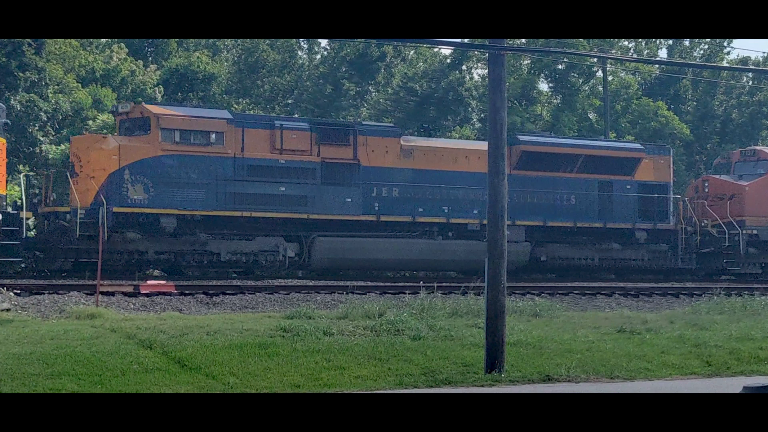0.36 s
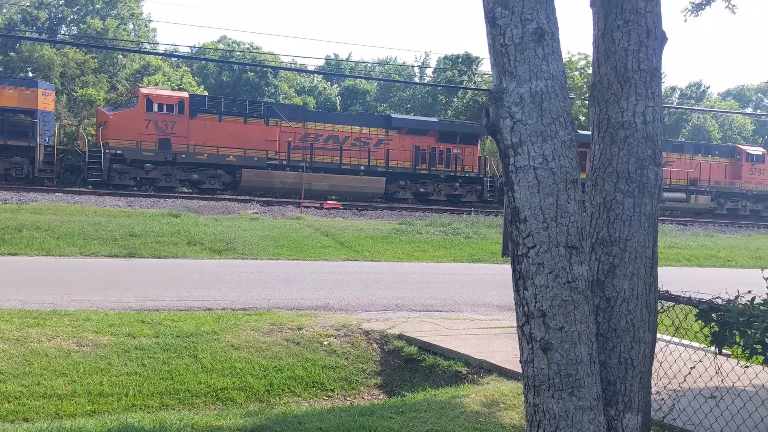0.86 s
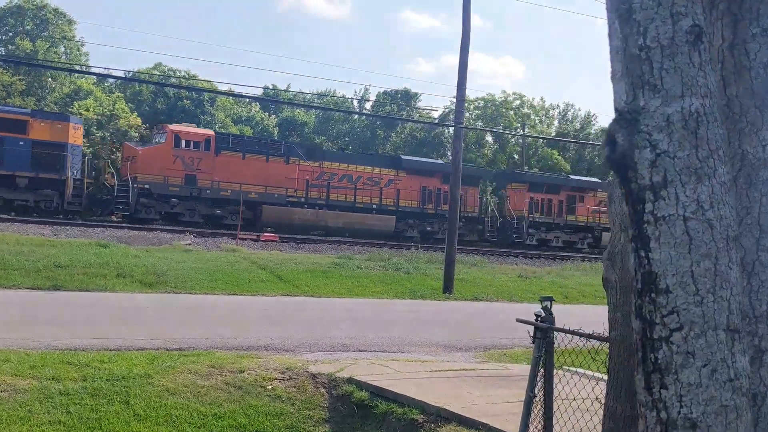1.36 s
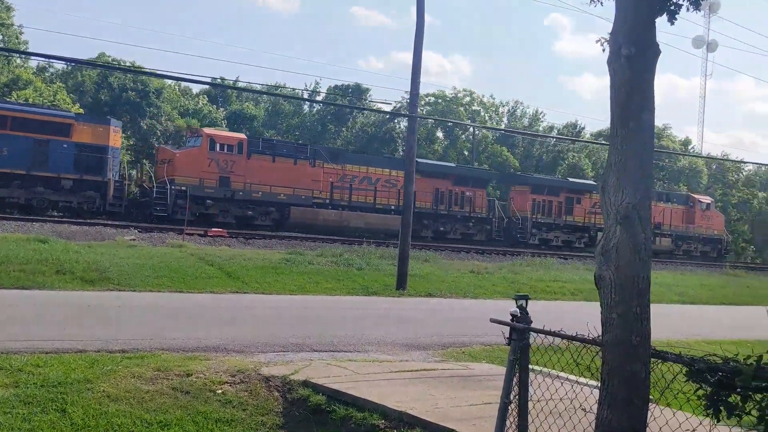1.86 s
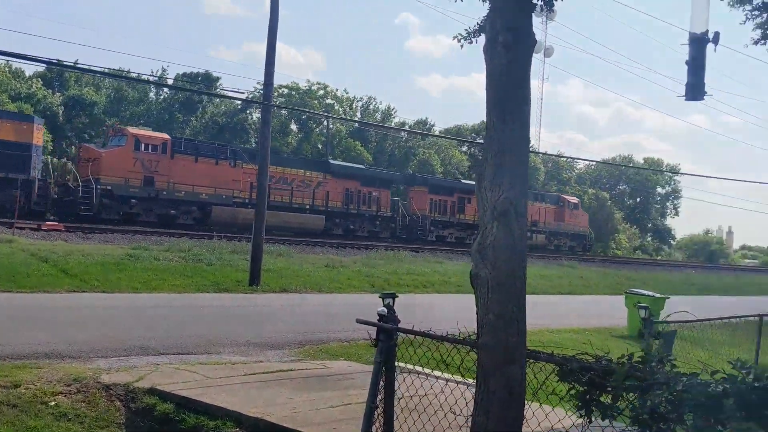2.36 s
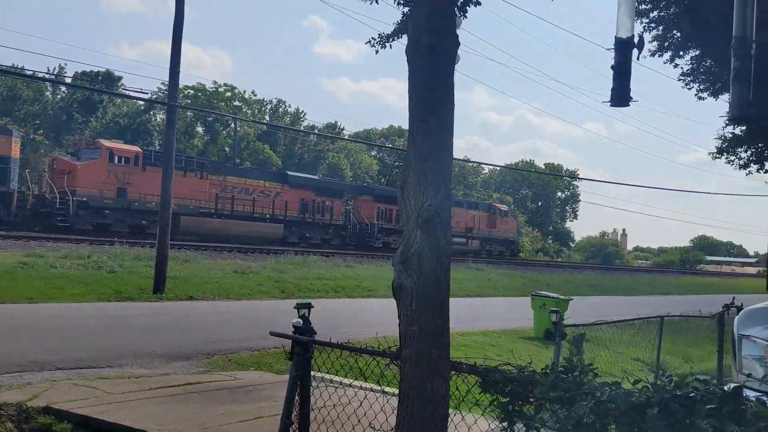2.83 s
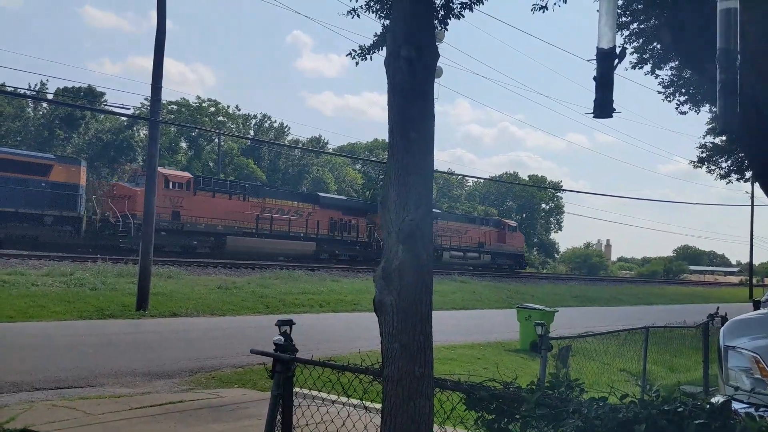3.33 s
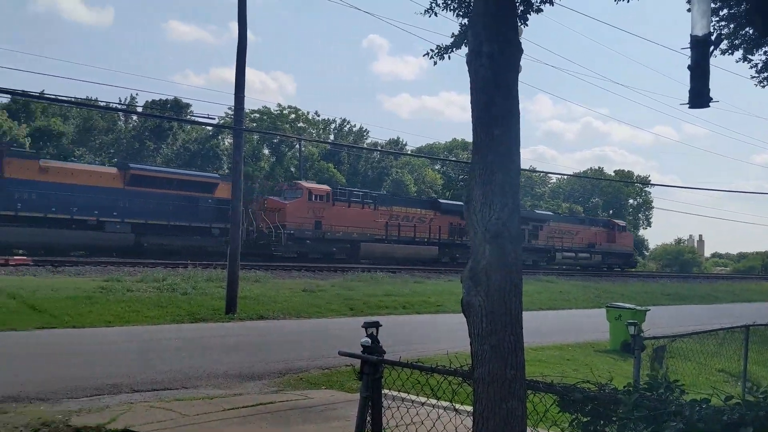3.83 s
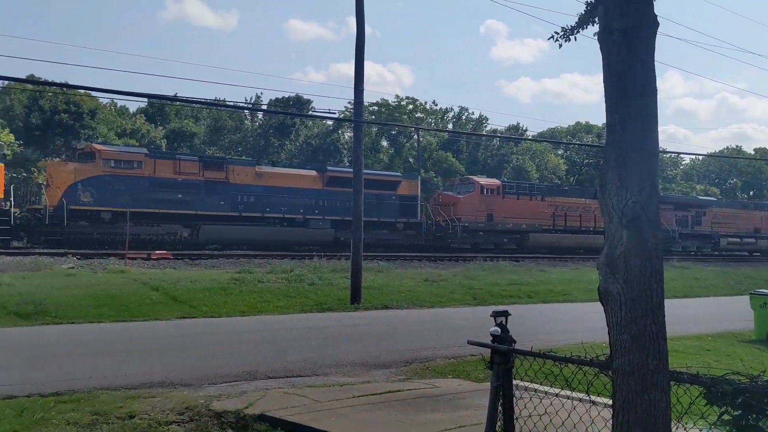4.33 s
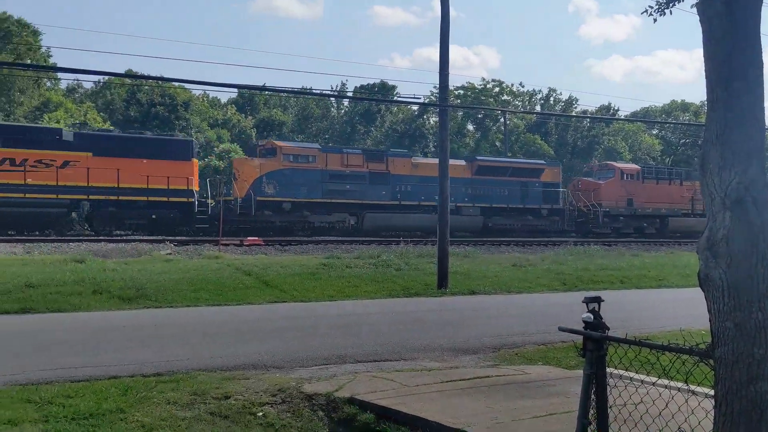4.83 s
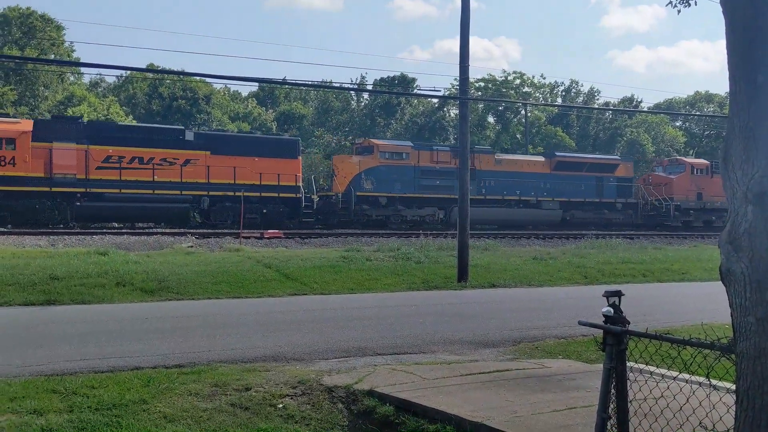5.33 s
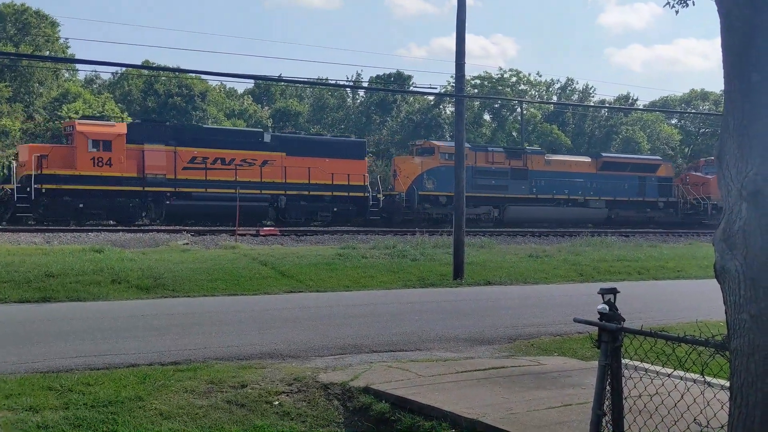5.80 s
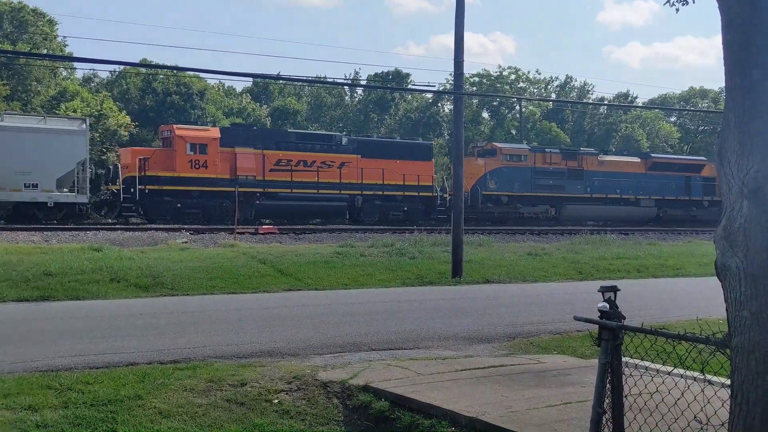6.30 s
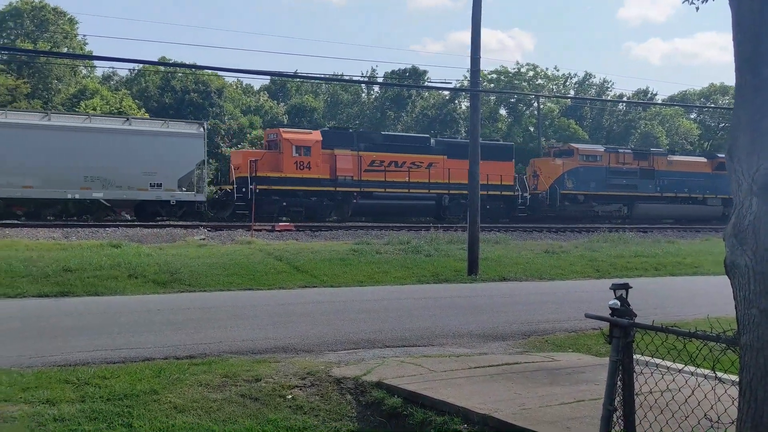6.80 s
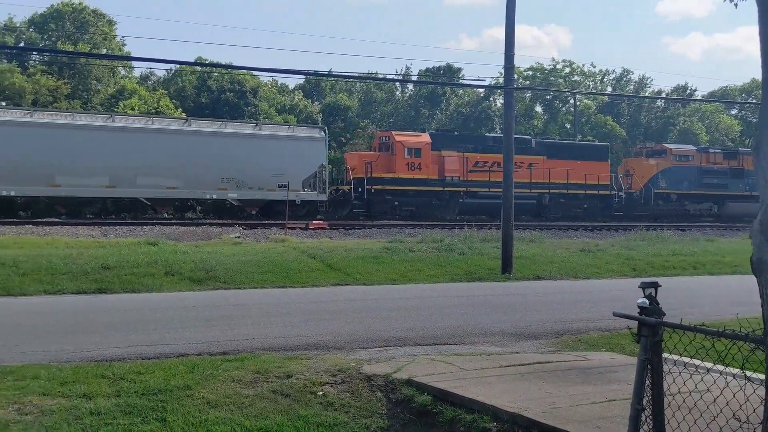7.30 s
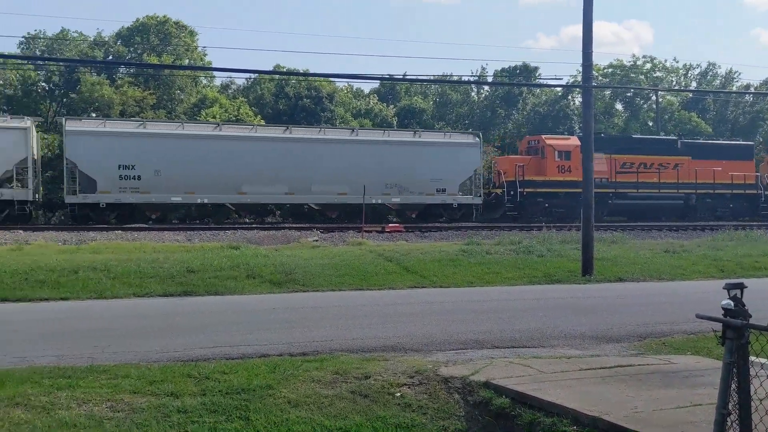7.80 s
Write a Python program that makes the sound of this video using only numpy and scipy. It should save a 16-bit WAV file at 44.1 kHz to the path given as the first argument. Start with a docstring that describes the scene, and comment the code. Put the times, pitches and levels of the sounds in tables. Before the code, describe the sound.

A slow freight train heard from across a road on a handheld stereo phone. Silence, then a sudden entry with a tiny dropout; two engine rhythms beat against each other under rough, wide wheel noise. Hissing puffs and whining gears peak as the middle locomotive passes, and the hum drops away. The last engine brings ticking clatter and ringing loose metal, then a few close snaps.

```python
"""Beside a railway, across a road: diesel locomotives haul a freight train slowly past a hand-held phone.
Crank orders of a four-stroke and a two-stroke engine throb against each other; a fan and gears whine as tones.
Wheels, exhaust, casing and air are bands of coloured noise; the valve clatter beats in time with the firing.
Loose metal pings as short resonances, and close ticks snap. The sound cuts in late, with one short dropout."""
import sys
import numpy as np
from scipy import signal
from scipy.fft import rfft, irfft, next_fast_len
from scipy.io import wavfile
from scipy.ndimage import map_coordinates

SR = 44100
rng = np.random.default_rng(int(sys.argv[2]) if len(sys.argv) > 2 else 0)


def ratio(d):
    """dB to gain"""
    e = np.asarray(d, float) / 20
    return 10 ** e


def transcribe(u):
    """Save the signal u as a 16-bit wav file named by the first command-line argument.

    u: samples, shape (n,) or (channels, n), limited to [-1, 1]; the rate is SR.
    q: integer samples, one column per channel.
    """
    v = np.clip(np.atleast_2d(u).T, -1, 1)
    q = np.round(v * 32767).astype(np.int16)
    wavfile.write(sys.argv[1], SR, q)


N = 359856

# colour of the noise at the two microphone ports, low to high, each:
# (frequency [Hz], left density [dB per Hz], right density [dB per Hz])
ROAR_COLOUR = [(292, 5.5, 14), (410, 7.5, 1), (460, 10, 7.5), (560, 9, 9), (595, 10.5, 10), (780, -1, 3.5),
               (826, 9, 4), (953, 6, 3), (979, 9, 13), (1104, 9, 1.5), (1210, 16.5, 11), (1280, 10, 13),
               (1431, 18.5, 14.5), (1458, -16, 12)]
# the same columns, for the valve clatter
CLATTER_COLOUR = [(1610, 5, 8), (1900, 6.5, 5), (2296, 3.5, 4.5), (2614, -5, -10.5), (2860, 2.5, -1),
                  (3270, 6, -9), (3440, -2, -1.5), (4540, -3.5, -11.5), (4770, -11, -3.5),
                  (5090, -2.5, -16), (6270, -8, -5.5), (6770, -6.5, -7.5)]
# the same columns, for the escaping air
HISS_COLOUR = [(7120, -5.5, -14), (7660, -19, -6.5), (8200, -0.5, -10), (8920, -5.5, -13), (9060, 1, -21),
               (9460, -8.5, -14), (10400, -14.5, -15.5), (10750, -10, -22), (11210, 2.5, -4),
               (11850, -4.5, -13), (13500, -12, -21), (14770, -18, -13), (15800, -26, -26)]
PORT_COLOUR = ROAR_COLOUR + CLATTER_COLOUR + HISS_COLOUR
# crank speeds, sinking as the engines draw away:
# (time [s], four-stroke cycles [per s], two-stroke turns [per s])
CRANK_SPEEDS = [(.9, 7.305, 12.68), (2, 7.281, 12.653), (3.2, 7.26, 12.617), (4.4, 7.255, 12.544),
                (5.6, 7.247, 12.496), (6.8, 7.24, 12.457), (8.1, 7.238, 12.43)]
# how much one engine dominates, as left-right likeness:
# (time [s], casing [0-1], upper rattle [0-1], knock [0-1])
ENGINE_FOCUS = [(.9, .3, 0.74, 0.3), (2, 0.16, 0.38, 0.19), (3.8, 0.33, 0.41, 0.13),
                (4.5, 0.16, 0.15, 0.12), (6.4, 0.79, 0.14, 0.17), (8.1, 0.94, 0.53, .35)]
# the treble sinks at the very end: (time [s], half length [s], change [dB])
END_DIP = (8.16, 0.11, -9)


def rms_one(x):
    """Scale to unit power."""
    return x / np.sqrt(np.mean(x ** 2) + 1e-20)


def in_time(rows):
    """Table columns as curves, one value a sample."""
    s, *columns = np.transpose(rows)
    return [np.interp(np.arange(N) / SR, s, c) for c in columns]


def at_hz(points, hz):
    """Read the columns of a spectrum on a log-frequency axis."""
    at, *columns = np.transpose(points)
    return np.array([np.interp(np.log(hz), np.log(at), c) for c in columns])


def swell(s, half_s, rise_db):
    """A bell-shaped rise (or dip) of level in dB, held in steps of 100 samples."""
    t = np.arange(0, N + 200, 100) / SR
    bell = rise_db * np.exp(-((t - s) / half_s) ** 2)
    return np.repeat(bell, 100)[50:N + 50]


def swells(rows):
    """Several rises added up."""
    return sum(swell(*row) for row in rows)


def own_swells(rows, which):
    """The added rises of those rows whose first column names this part."""
    return swells(row[1:] for row in rows if round(row[0]) == which)


def step(s, within_s):
    """A smooth change from 0 to 1."""
    return .5 + .5 * np.tanh((np.arange(N) / SR - s) / within_s)


def drift(rate):
    """Slow random curve of spread 1: coarse noise through a double one-pole with its corner at rate [Hz]."""
    r = np.exp(-80 * np.pi * rate / SR)  # one coarse value every 40 samples
    coarse = rng.standard_normal(N // 40 + 2002)
    slow = signal.lfilter([1], [1, -2 * r, r * r], coarse)[2000:]  # skip the filter's start
    return np.interp(np.arange(N) / 40, np.arange(len(slow)), rms_one(slow))


def noise(colour, low_hz, high_hz, level_db, patchy_db, focus=None):
    """A steep band of noise at two partly alike ports; its level wavers, partly on each side alone."""
    # how alike the ports sound: (frequency [Hz], likeness [0-1])
    port_likeness = [(270, 0.95), (450, 0.91), (740, 0.58), (1200, 0.32), (2000, 0.4), (4000, 0.044),
                     (8000, 0.045)]
    size = next_fast_len(N)
    hz = np.arange(1, size // 2 + 2) * SR / size
    band = 1 / np.sqrt((1 + (low_hz / hz) ** 40) * (1 + (hz / high_hz) ** 40))
    gain = ratio(at_hz(colour, hz)) * band
    shared, own = rfft(rng.standard_normal((2, size)))
    if focus is None:  # likeness by frequency
        alike = np.clip(at_hz(port_likeness, hz)[0], 0, 1)
        mid, side = np.sqrt(1 + alike) * shared, np.sqrt(1 - alike) * own
        pair = irfft(np.array([mid + side, mid - side]) * gain, size)[:, :N]
    else:  # likeness by time
        alike = np.clip(focus, 0, 1)
        mid, side = irfft(shared * gain, size)[:, :N], irfft(own * gain, size)[:, :N]
        pair = np.sqrt(1 + alike) * mid + np.sqrt(1 - alike) * side * [[1], [-1]]
    pair = pair / np.sqrt(np.mean(pair ** 2) * 0.59)
    each_side = np.array([drift(2.2), drift(0.97)])
    return pair * ratio(level_db + patchy_db * (drift(10.0) + 1.03 * each_side))


def tone(turns, level_db, waver_db):
    """A sine on a running phase, with a slight waver of level."""
    level = ratio(level_db + waver_db * drift(0.44))
    return np.sqrt(2) * level * np.sin(2 * np.pi * turns)


def whine(hz, level_db, wobble, lead=0):
    """One tone whose phase wobbles (in turns), which widens its line; lead is in radians."""
    turns = np.cumsum(hz) / SR + lead / (2 * np.pi) + wobble * drift(5.9)
    return tone(turns, level_db, waver_db=0.1)


def nearness():
    """The last engine comes near: 0 before, 1 after."""
    return step(6.68, within_s=0.14)


def knock_beat(depth, swell_s):
    """Six knocks per four-stroke cycle, each a quick swell that dies away; power kept at 1."""
    # strength of the valve knocks in one engine cycle: (level [dB])
    knock_strengths = [-0.5, -16, 12.5, 5.5, 14.5, -9]
    count = len(knock_strengths)
    slots = np.cumsum(in_time(CRANK_SPEEDS)[0]) / SR * count
    which = slots.astype(int)
    uneven_db = 1.7 * rng.standard_normal(which[-1] + 1)[which]
    strength = ratio(np.array(knock_strengths)[which % count] + uneven_db)
    since = (slots - which) / (np.gradient(slots) * SR * swell_s)  # time since the knock, in swell_s
    pulses = rms_one(strength * since ** 2 * np.exp(-since))
    share = np.clip(depth, 0, 1)
    return np.sqrt(1 - share + share * pulses ** 2)


def wheel_roar(lag):
    """Wheel noise, fuller as the middle engine is abreast; from the whole train, so its lag is smaller."""
    # the roar while the middle engine is abreast: (time [s], half length [s], rise [dB])
    abreast_swell = (4.76, 0.96, 1.9)
    level_db = -23 - 0.6447 * np.arange(N) / SR + swell(*abreast_swell)
    roar = noise(ROAR_COLOUR, 322.0, 1129, level_db, patchy_db=0.4)
    roar[0] = np.interp(np.arange(N) - 0.38 * lag, np.arange(N), roar[0])
    return roar


def air():
    """Escaping air hisses: dull puffs feed the whistling band, bright ones the top hiss, both the low hiss."""
    # puffs, before each band takes its share: (time [s], half length [s], rise [dB], brightness [0-1])
    air_puffs = [(2.7, 0.21, 7.5, 0.16), (3.275, 0.14, 4, 0.3), (4.15, 0.13, 7, 0.75),
                 (4.515, 0.21, 9.5, 0.63), (5.223, 0.091, 13.5, 0.6), (5.617, 0.06, 8, 0.3),
                 (5.823, 0.17, 11, 1), (6.55, 0.045, 6, 1), (7.06, 0.62, 8.5, 0.03), (7.92, 0.19, 11, 0.3)]
    abreast_db = swell(4.3, 3, 6.5) + swell(*END_DIP)  # loudest abreast
    dull_db = swells((s, half_s, db * (1 - bright)) for s, half_s, db, bright in air_puffs)
    bright_db = swells((s, half_s, db * bright) for s, half_s, db, bright in air_puffs)
    opening_db = 3 * step(3.9, 0.098)  # the low hiss opens up
    low_db = -46.5 + opening_db + 0.26 * dull_db + 0.45 * bright_db + abreast_db
    whistle_db = -48 + abreast_db + 1.08 * dull_db
    top_db = -51.5 + abreast_db + 0.83 * bright_db
    out = noise(PORT_COLOUR, 6830, 11240, low_db, patchy_db=0.94)
    out += noise(PORT_COLOUR, 10400, 11200, whistle_db, patchy_db=1.5)
    return out + noise(PORT_COLOUR, 12400, SR / 2, top_db, patchy_db=0.9)


def ticks():
    """Sharp ticks close to the microphone: a snap with a millisecond of noise, without bass."""
    # close ticks: (time [s], nominal peak [dB], left over right [dB])
    close_ticks = [(8.0022, -17, .2), (8.0135, -5, -1.2), (8.0401, -5.5, 2.2)]
    out, t = np.zeros((2, N)), np.arange(200) / SR
    for s, peak_db, pan_db in close_ticks:
        hiss = 1.05 * rng.standard_normal(len(t)) * t / .0004 * np.exp(-t / .0004)
        snap = np.exp(-abs(t - .0004) / .00002)
        burst = signal.lfilter([1, -1], [1, -.75], hiss - snap)
        at = round(s * SR)
        out[:, at:at + len(t)] += ratio(peak_db + pan_db * np.array([[.5], [-.5]])) * burst
    return out


def fan():
    """The cooling fan hums on one pitch, fades and is then screened off."""
    level_db = -23.5 - 1.17 * np.arange(N) / SR - 21.5 * step(4.59, within_s=0.055)
    return whine(np.full(N, 209.4), level_db, wobble=.02)


def gears():
    """Each gear whines at its multiple of the two-stroke speed; its direction swings as it passes."""
    # pitch of each gear: (multiple of the two-stroke crank speed)
    gear_multiples = [47.93, 78.86, 112.8, 187.9]
    # each gear crosses in front: (time [s], within [s], left lead before [rad], after [rad],
    # left over right before [dB], after [dB])
    crossings = [(4.8, 2.5, .7, -.45, -4, 2), (3.7, .5, 2.8, .2, -7, 3), (5.1, .3, 2.4, -1.9, 1, 2),
                 (5, 1.5, .3, -1.5, 3, 0)]
    # resting level of each gear: (level [dB])
    resting_levels = [-43, -43.5, -43.5, -50]
    # a whine swells out of the roar: (gear [0-3], time [s], half length [s], rise [dB])
    gear_swells = [(0, 0.75, 0.25, 22), (0, 1.37, 0.41, 14), (0, 2.12, 0.29, 12.5), (0, 3.61, 0.17, 14.5),
                   (0, 4.21, 0.35, 11.5), (0, 4.77, 0.2, 12), (0, 5.66, 0.26, 12.5), (0, 6.3, 0.69, 8.5),
                   (0, 7.06, 0.59, 9), (1, 2.5, 0.47, 19.5), (1, 3.97, 0.11, 10), (1, 4.28, 0.29, 16),
                   (1, 4.97, 0.22, 19), (1, 5.45, 0.27, 14), (1, 5.97, 0.069, 15), (1, 6.45, 0.4, 12),
                   (1, 6.92, 0.12, 12), (2, 4.55, 0.18, 15), (2, 5.27, 0.31, 11), (2, 6.87, 0.45, 13),
                   (3, 6.1, 0.37, 9), (3, 5.3, 0.8, 7.5)]
    turns_per_s = in_time(CRANK_SPEEDS)[1]
    out, sides = 0, np.array([[.5], [-.5]])
    for i, (multiple, crossing) in enumerate(zip(gear_multiples, crossings)):
        s, within_s, lead, lead_after, pan_db, pan_after_db = crossing
        past = step(s, within_s)
        side_db = sides * (pan_db + (pan_after_db - pan_db) * past)
        side_lead = sides * (lead + (lead_after - lead) * past)
        level_db = resting_levels[i] + own_swells(gear_swells, i) + side_db
        out = out + whine(multiple * turns_per_s, level_db, wobble=0.017, lead=side_lead)
    return out


def pings(modes_hz, level_db):
    """Random clicks ring a few short modes, louder at the left port."""
    clicks_per_s, ring_t60_s = 50, 0.013  # clicks for each mode
    shape = (len(modes_hz), N)
    sizes = ratio(3 * np.minimum(rng.exponential(1, shape), 3))
    clicks = (rng.random(shape) < clicks_per_s / SR) * sizes
    r = ratio(-60 / (ring_t60_s * SR))
    rings = 0
    for hz, mode_clicks in zip(modes_hz, clicks):
        poles = [1, -2 * r * np.cos(2 * np.pi * hz / SR), r * r]
        rings = rings + signal.lfilter([1, -1], poles, mode_clicks + 1e-18)
    softened = signal.lfilter([.2], [1, -.8], rings)
    return rms_one(softened) * ratio(level_db + np.array([[2.5], [-2.5]]))


def clanks():
    """Each loud ping swells within milliseconds and rings out over 104 cycles, louder at the left port."""
    # the loudest pings: (time [s], nominal peak [dB], pitch [Hz])
    loud_pings = [(6.1226, -20, 3170), (6.2747, -17.5, 3290), (6.5587, -22, 3130), (6.7463, -16, 3130),
                  (6.885, -22, 3330), (7.024, -18, 3440), (7.06, -23, 4000), (7.102, -14, 3180),
                  (7.113, -17, 3370), (7.2431, -21, 4460), (7.4811, -25, 4330), (7.5185, -20.5, 4310),
                  (7.6557, -15, 4230), (7.9365, -18, 5970)]
    out, t = np.zeros((2, N)), np.arange(2000) / SR
    for s, peak_db, hz in loud_pings:
        at = round(s * SR)
        ring = (1 - np.exp(-t / 0.0014)) * ratio(-60 * t * hz / 104.0) * np.sin(2 * np.pi * hz * t)
        # 3.5 dB makes up for the slow attack
        out[:, at:at + len(t)] += ratio(peak_db + 3.5 + np.array([[2.5], [-2.5]])) * ring
    return out


def casing_rattle():
    """The engine casing rattles in two bands of noise that beat slightly with the firing."""
    # louder rattles: (time [s], half length [s], casing rise [dB], part of it in the upper band [0-1])
    rattle_swells = [(1.146, 0.39, 4.5, 0.55), (2.81, 0.082, 2, 0.5), (3.254, 0.89, 4.5, 0.46),
                     (3.33, 0.067, 3, 0.4), (3.694, 0.054, 5.5, 0.8), (3.94, 0.14, 6, 0.66),
                     (4.9, 0.89, 3, 0.17), (5.7, 0.5, 2.5, 1), (6.993, 0.2, 5, 0.5), (7.782, 0.12, 8, 0.4)]
    casing, upper, _ = in_time(ENGINE_FOCUS)
    casing_db = -28.5 - 0.28 * np.arange(N) / SR + swells(row[:3] for row in rattle_swells)
    upper_db = -30.5 - 1 * step(3.3, 0.032)  # screened off a little
    upper_db = upper_db + swells((s, half_s, db * part) for s, half_s, db, part in rattle_swells)
    low = noise(PORT_COLOUR, 1168, 1620, casing_db, patchy_db=0.67, focus=casing)
    high = noise(PORT_COLOUR, 1664, 2730, upper_db, patchy_db=1.07, focus=upper)
    return low * knock_beat(0.2, swell_s=0.0022) + high * knock_beat(0.15, swell_s=0.0023)


def valve_gear():
    """Valve gear knocks and clatters as noise in time with the firing, and loose metal rings with it."""
    # the ringing knock flares: (time [s], half length [s], rise [dB])
    knock_flares = [(1.9, 0.13, 2), (6.4, 1, 4.5), (7.09, 0.028, 5)]
    # pitches of the loose metal: (frequency [Hz])
    ping_pitches = [3110, 3300, 3290]
    # a short scrape makes the pings loud: (time [s], half length [s], rise [dB])
    metal_scrape = (7.09, 0.032, 5.7)
    # parts that clatter on their own: (low edge [Hz], high edge [Hz], share [dB])
    valve_parts = [(3800, 4600, -4.5), (4600, 5500, -5.5), (5500, 6400, -7), (6400, 7600, -7)]
    # one part clatters louder for a while: (part [0-3], time [s], half length [s], rise [dB])
    part_swells = [(0, 3.5, 0.82, 3), (1, 5.46, 0.85, 4.5), (2, 5.5, .5, 5)]
    near = nearness()
    depth = 0.14 + 0.13 * near  # of the beat, before each layer takes its share
    ringing_db = -34.5 + 2.31 * near + swells(knock_flares)
    out = pings(ping_pitches, ringing_db - 3 - 4.3 * (1 - near) + swell(*metal_scrape))
    # smaller parts jingle with the knocks once the last engine is near
    jingle = pings([4300, 5000, 5940, 6650], -39 + swell(*END_DIP))
    out += jingle * near * knock_beat(0.5, swell_s=0.0049)
    focus = in_time(ENGINE_FOCUS)[2]
    knock = noise(PORT_COLOUR, 2290, 3820, ringing_db - 1.0 * near, patchy_db=1.07, focus=focus)
    out += knock * knock_beat(0.65 * depth, swell_s=0.0027)
    clatter_db = -37 + 5.5 * near + swell(*END_DIP)
    for i, (low_hz, high_hz, share_db) in enumerate(valve_parts):
        part_db = clatter_db + share_db + own_swells(part_swells, i)
        part = noise(PORT_COLOUR, low_hz, high_hz, part_db, patchy_db=1.0)
        out += part * knock_beat(0.84 * depth, swell_s=0.0029)
    return out


def exhaust_rumble():
    """The exhaust rumbles as smooth low noise that fades with time."""
    # colour of the rumble: (frequency [Hz], density [dB per Hz])
    rumble_colour = [(25, -28), (40, -15), (60, -2), (90, -5.5), (120, -6.5), (150, -10), (200, -9),
                     (250, -16), (320, -20.5), (360, -42)]
    level_db = -18.5 - 1.07 * np.arange(N) / SR
    return noise(rumble_colour, 14, 380, level_db, patchy_db=0.85)


def engine(rate, orders, changes):
    """Sines at multiples of the crank cycle; each changes with distance and swells past obstacles."""
    turns, t, out = np.cumsum(rate) / SR, np.arange(N) / SR, 0
    for order, level_db, fade_db in orders:
        # orders 12 and 15 keep step with the exhaust pulse, trailing it by a fifth of their own cycle
        lag_turns = 0.2 if order in (12, 15) else rng.random()
        order_db = level_db + fade_db * t + own_swells(changes, order)
        out = out + tone(order * turns - lag_turns, order_db, waver_db=.5)
    return out


def engine_throb():
    """A four-stroke and a two-stroke engine at slightly sinking speeds throb against each other."""
    # orders of the four-stroke cycle: (order, level at 0 s [dB], change with distance [dB per s])
    four_orders = [(9, -24, -1.2), (10, -32, -0.2), (11, -26, -0.5), (12, -12.5, -1.6), (13, -23.5, -0.5),
                   (15, -14.3, -0.4), (16, -27, -1), (18, -29, -1.3), (20, -28.5, -1.75), (21, -29, -1.02),
                   (28, -32.5, -1.16), (30, -32, -0.5)]
    # orders of the two-stroke turn: (order, level at 0 s [dB], change with distance [dB per s])
    two_orders = [(5, -23.5, -0.03), (6, -30, 0.2), (7, -30, -0.4), (8, -22, 0.2), (10, -39, 2)]
    # four-stroke orders as the stack moves past obstacles: (order, time [s], half length [s], rise [dB])
    four_swells = [(12, 3.24, 0.52, -7.5), (12, 5.93, 0.86, 5), (15, 2.84, 0.71, 4.5),
                   (15, 5.4, 0.38, -3.5), (9, 1.1, 1, -22)]
    # two-stroke orders, likewise: (order, time [s], half length [s], rise [dB])
    two_swells = [(5, 1.3, 0.36, -15), (5, 5.4, 0.53, 2.5), (5, 8.2, 0.41, -8), (8, 5.3, 0.51, 4.5),
                  (10, 0.81, 0.29, 12), (10, 8.3, 0.54, -5.5)]
    four, two = in_time(CRANK_SPEEDS)
    return engine(four, four_orders, four_swells) + engine(two, two_orders, two_swells)


def scene():
    """Layers the train; the arrival lag between the ports follows the moving train."""
    # how late sound reaches the left port: (time [s], lag [ms])
    left_lag = [(.9, 0.02), (4.2, -0.02), (4.8, 0.16), (6, 0.2), (8.1, 0.29)]
    lag = in_time(left_lag)[0] * SR / 1000  # in samples
    throb = engine_throb() * ratio(np.array([[-.2], [.2]]))
    left, right = throb + fan() + exhaust_rumble() + casing_rattle() + valve_gear() + air()
    left = map_coordinates(left, [np.arange(N) - lag], order=5, mode="nearest")
    return np.array([left, right]) + wheel_roar(lag) + gears() + ticks() + clanks()


def roll_off(x):
    """The treble ends steeply here."""
    return signal.sosfilt(signal.butter(12, 16550, fs=SR, output="sos"), x)


def record(dry):
    """Peaks are rounded, the top is cut; the sound fades in within milliseconds and drops out once."""
    t = np.arange(N) / SR
    fade_in = np.clip((t - .8332) / 0.0017, 0, 1)
    outside_dropout = (t < .8449) | (t > .8577)
    rounded = 1.442 * np.tanh(dry / 1.385)
    top_cut = signal.ellip(10, .5, 60, 15780, fs=SR, output="sos")
    mix = signal.sosfilt(top_cut, rounded * fade_in * outside_dropout)
    return roll_off(mix)


dry = scene()
out = record(dry)
transcribe(out)
```